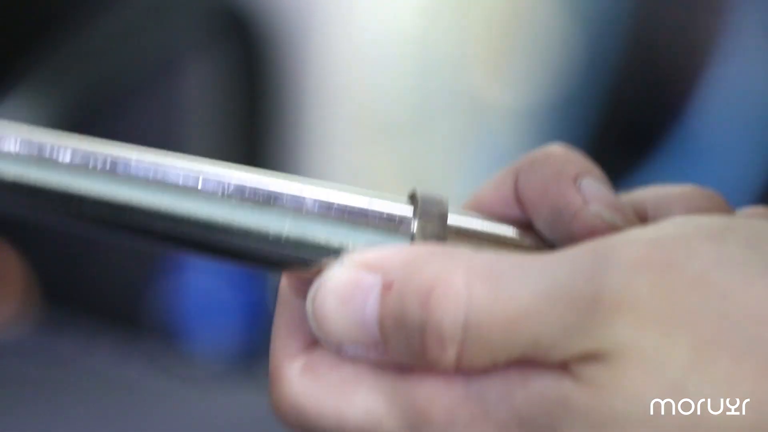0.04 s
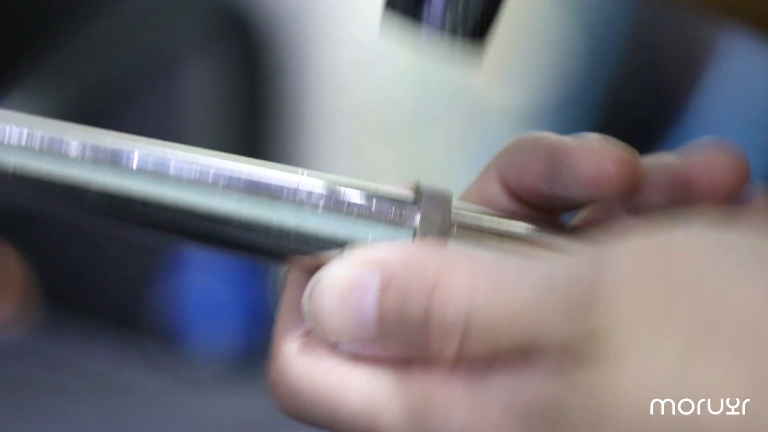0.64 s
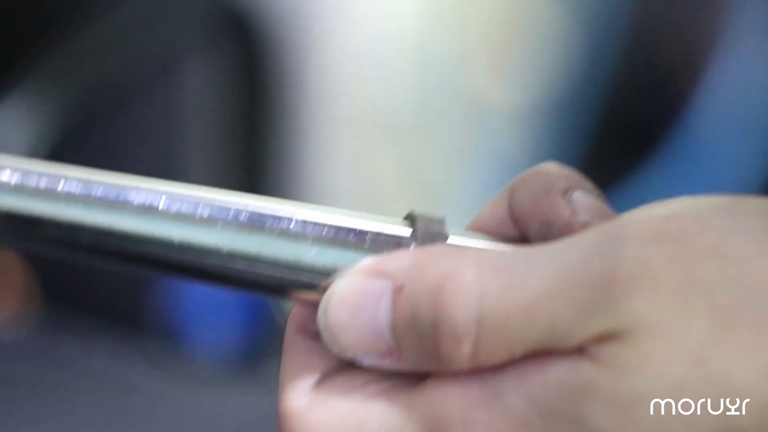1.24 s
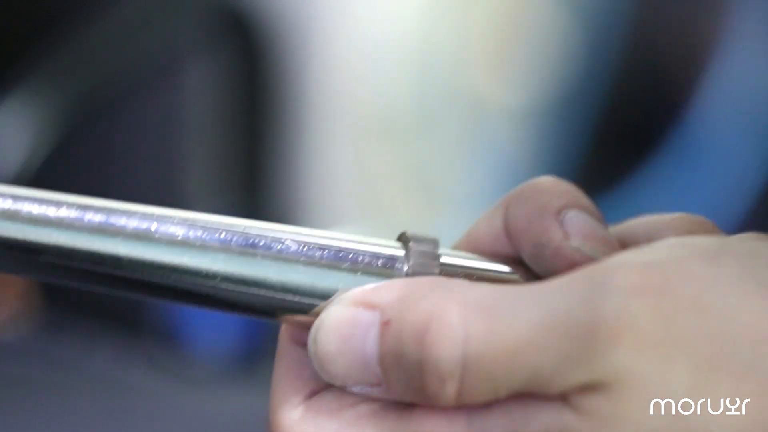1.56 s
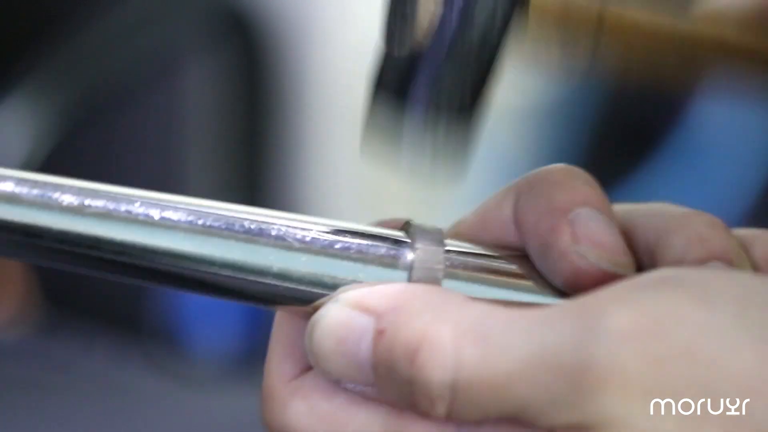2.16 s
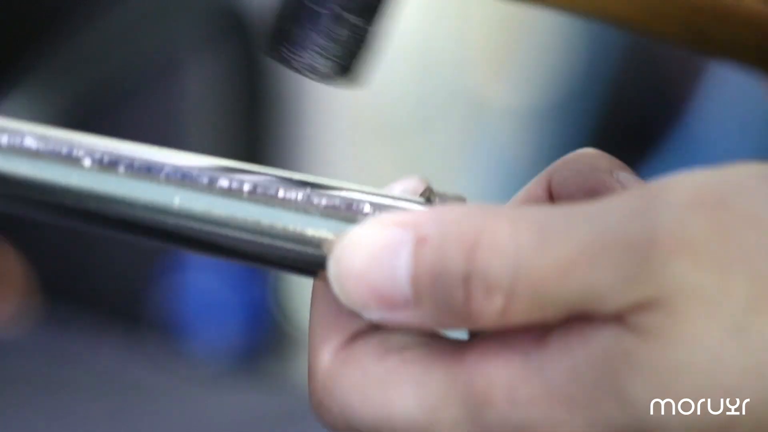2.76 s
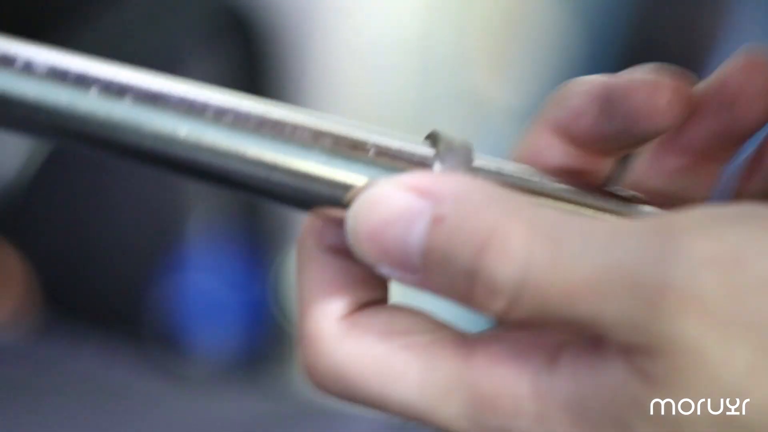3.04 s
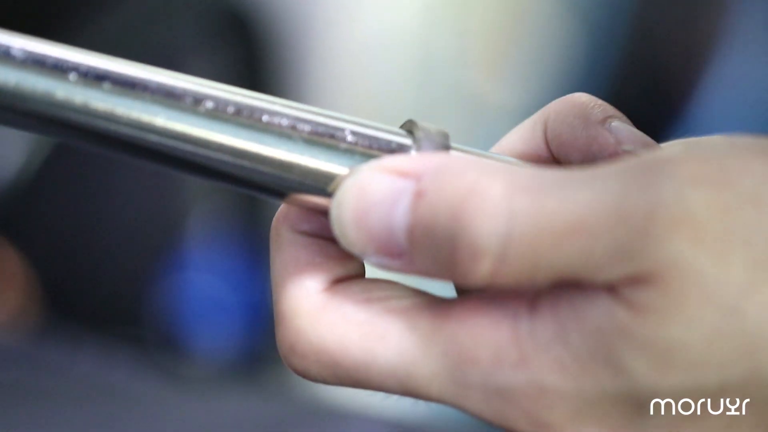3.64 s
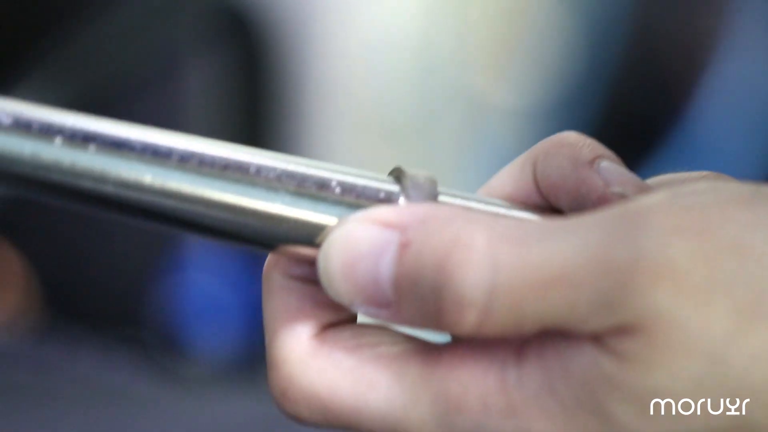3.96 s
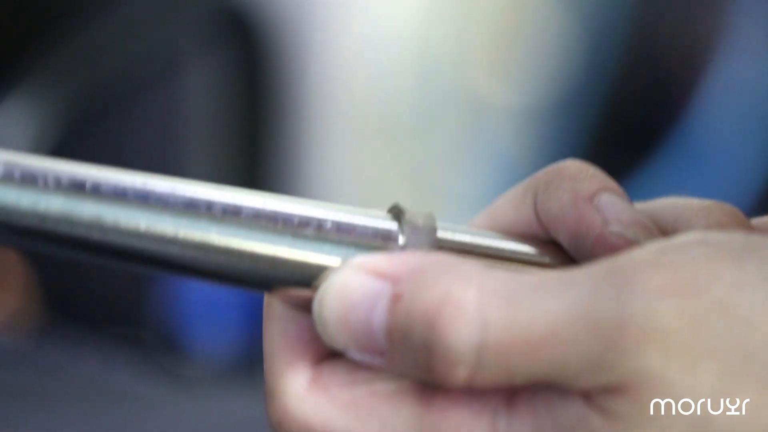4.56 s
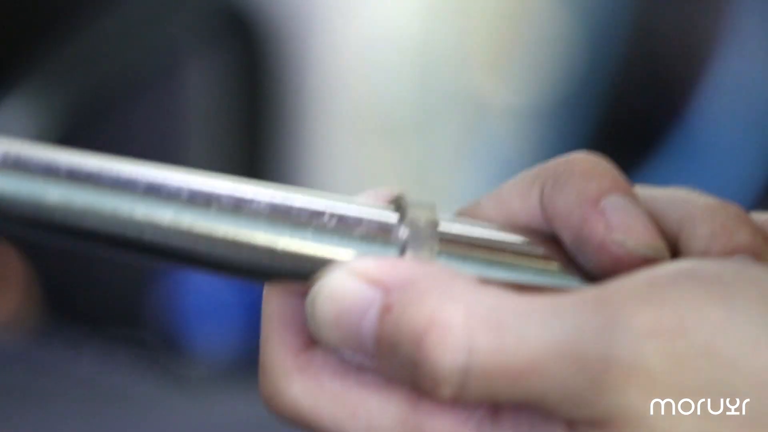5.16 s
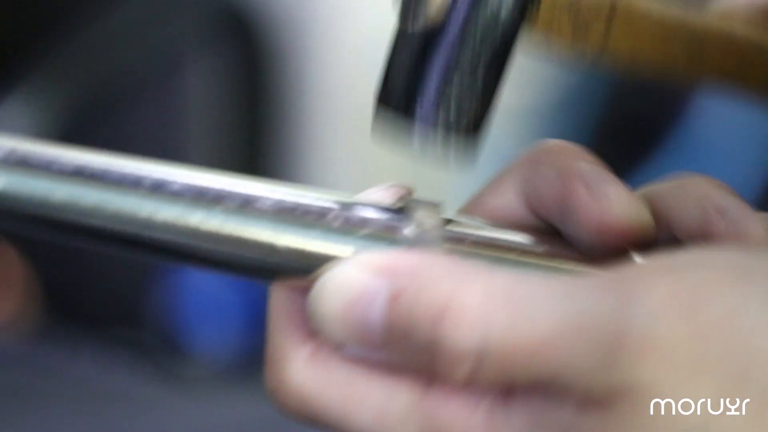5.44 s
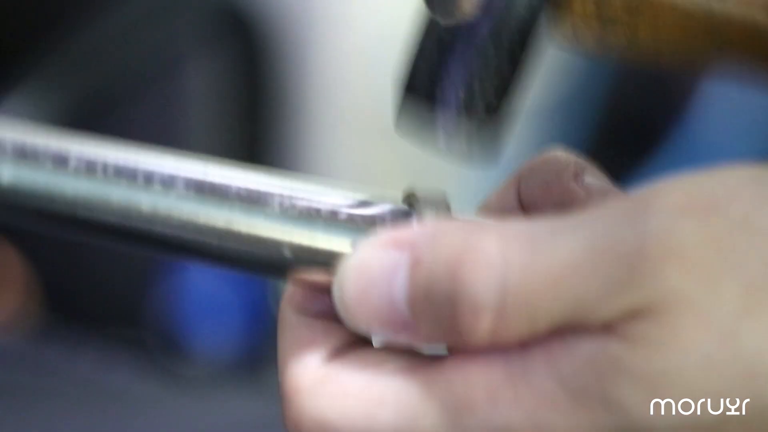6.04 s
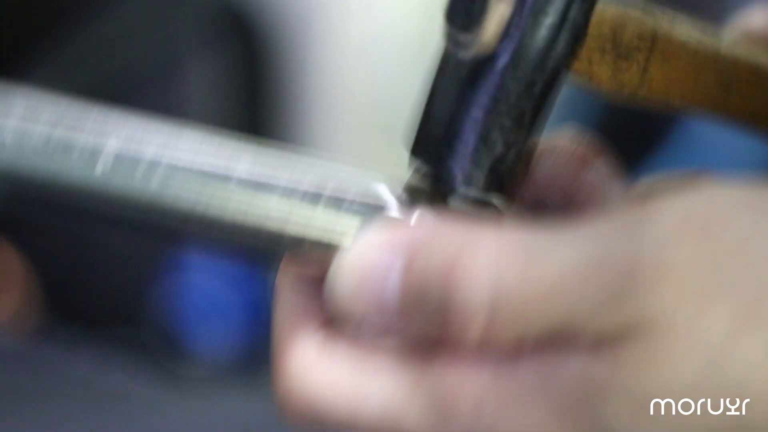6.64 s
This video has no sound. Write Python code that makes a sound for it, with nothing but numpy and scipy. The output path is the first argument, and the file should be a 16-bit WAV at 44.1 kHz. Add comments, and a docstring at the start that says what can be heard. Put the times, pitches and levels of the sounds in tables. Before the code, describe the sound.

In a small, quiet workshop, runs of crisp metallic clinks sound close to the microphone as a little hammer strikes a ring on a steel bar. The hand quickly damps each high ring, and the hits clip slightly. The even tapping skips a beat, carries on, then stops for about a second of soft scuffing and skin sliding on steel. It starts again and skips once more near the end, over faint air noise and hum.

```python
"""Tapping a ring on a mandrel

A small steel hammer taps a ring on a hand-held steel mandrel, about three blows a second, in a small
workshop. Each impact cracks and excites the bar's bending modes; the hand damps them and the room
carries them on. Soft scuffs fall between blows, and in the long pause the fingers slide along the bar
to turn the ring. The close microphone overloads, and its gain control ducks the noise after each blow."""
import sys
import numpy as np
from scipy import signal
from scipy.fft import rfft, irfft
from scipy.io import wavfile
from scipy.ndimage import minimum_filter1d

SR = 44100
rng = np.random.default_rng(int(sys.argv[2]) if len(sys.argv) > 2 else 0)


def wav_out(sig):
    """Save sig, one row per channel (or a flat mono array), as 16-bit PCM at SR to the path in sys.argv[1]."""
    wavfile.write(sys.argv[1], SR, np.round(np.clip(np.atleast_2d(sig).T, -1, 1) * 32767).astype(np.int16))


N = 304731
TIME = np.arange(N) / SR
LEAD = SR // 5  # samples before time zero: the hammering is already under way
SIDES = np.array([[.5], [-.5]])  # splits a left-minus-right difference over the two channels

# Hammer blows. Each row: start in seconds, relative force in dB, brightness in dB (hardness of contact).
BLOWS = [(-.11, 2, 2), (.2208, 0, 2.5), (0.5516, 0, 1.5), (1.1741, -0.99, 0), (1.5047, 0, 0.5),
         (1.83, 0, 3), (2.152, 0, 3), (2.4726, -1.8, -3), (3.768, -3, -4.5), (4.1119, 0, 4), (4.4377, 0, 6),
         (4.7665, -1, 4.5), (5.0861, -2, 4.5), (5.4171, -1, 3), (6.0507, 0, 2.5), (6.3786, .5, 3.5),
         (6.6959, 0, 3)]


def undb(db):
    """Convert decibels to an amplitude ratio."""
    return 10 ** (np.asarray(db) / 20)


def unit(x):
    """Normalise each channel to an rms of 1."""
    return x / np.sqrt(np.mean(x ** 2, axis=-1, keepdims=True))


def decay(t, t60):
    """Exponential damping: the level falls 60 dB in t60 seconds."""
    return np.exp(-np.log(1000) * t / t60)


def bump(centre_s, length_s):
    """A Gaussian envelope: a smooth rise and fall."""
    return np.exp(-(2 * (TIME - centre_s) / length_s) ** 2)


def along(hz, points):
    """Interpolate (Hz, value) points on a logarithmic frequency axis."""
    point_hz, values = np.transpose(points)
    return np.interp(np.log(np.maximum(hz, 1)), np.log(point_hz), values)


def highpass(x, hz, order):
    """A Butterworth filter: below the cutoff the level falls 6 dB per octave for each order."""
    return signal.sosfilt(signal.butter(order, hz, "highpass", fs=SR, output="sos"), x)


def colour(x, points, size=4096):
    """A minimum-phase filter with the given (Hz, dB) spectral shape and unit power gain."""
    cepstrum = irfft(along(np.fft.rfftfreq(size, 1 / SR), points) * np.log(10) / 20)
    cepstrum[1:size // 2] *= 2  # folding the cepstrum makes the response causal
    cepstrum[size // 2 + 1:] = 0
    response = irfft(np.exp(rfft(cepstrum)))
    return signal.oaconvolve(x, response[None] / np.linalg.norm(response), axes=-1)[:, :x.shape[-1]]


def stereo_noise(size, side):
    """White noise whose coherence between the ears falls from full at side = 0 to none at side = 1."""
    mid, apart = rng.standard_normal((2, size))
    return unit(np.array([mid + side * apart, mid - side * apart]))


def add(track, start_s, sound):
    """Superpose a sound on a track that begins LEAD samples before time zero."""
    start = LEAD + int(start_s * SR)
    track[:, start:start + sound.shape[-1]] += sound[:, :track.shape[-1] - start]


def cracks(room, blow_db=13.5, t60=0.021, room_db=-2.46, pan_db=-1.0):
    """Impact noise: hammer face, ring and bar clash briefly; parts this small radiate no bass."""
    # Spectrum of the crack. Each row: frequency in Hz, relative level in dB.
    spectrum = [(1000, -27.5), (1500, -13), (2300, -11.5), (2850, -6), (4000, -3), (5000, -7), (6100, -2),
                (7200, -2), (8700, -3), (9800, -6), (12000, -18.5), (14500, -27.5), (16000, -24)]
    # Light touches of the ring on the bar. Each row: start in seconds, relative level in dB.
    ticks = [(2.827, -46)]
    impacts = [(start, blow_db + force_db) for start, force_db, _ in BLOWS] + ticks
    t, track = TIME[:SR // 10], np.zeros((2, LEAD + N))
    for start, db in impacts:
        add(track, start, undb(db) * stereo_noise(len(t), side=0.98) * decay(t, t60))
    radiated = highpass(colour(track, spectrum), hz=900, order=3)
    return in_room(radiated, room, room_db) * undb(pan_db * SIDES)


def hammer(left_lead_rad=-1.11, pan_db=-3, pitch_scatter=0.019):
    """Free vibration: the head's heavily damped modes ring at slightly different pitches on each blow."""
    # Modes of the hammer head. Each row: frequency in Hz, relative level in dB, T60 in seconds.
    modes = [(2940, 6.5, 0.02), (5925, 18, 0.0086), (8289, 21.5, 0.0058)]
    t, track = TIME[:SR // 20], np.zeros((2, LEAD + N))
    detunings = 1 + pitch_scatter * rng.standard_normal((len(BLOWS), len(modes)))
    for (start, _, _), blow_detunings in zip(BLOWS, detunings):
        for (hz, db, t60), detune in zip(modes, blow_detunings):
            envelope = undb(db + pan_db * SIDES) * decay(t, t60)
            add(track, start, envelope * np.sin(2 * np.pi * hz * detune * t + left_lead_rad * SIDES))
    return track[:, LEAD:]


def mandrel(room, twin_db=-1.5, split_scatter=0.23, low_hz=3500, high_hz=8000):
    """Beating modes: the bar bends in two planes at slightly different pitches, split by the grip."""
    # Pairs of bending modes. Each row: frequency in Hz, relative level in dB, T60 in seconds,
    # reverberant-to-direct ratio in dB, left minus right in dB, phase lead of the left in radians,
    # rise of pitch in Hz per second, typical split of the pair in Hz.
    modes = [(699.2, -29, 0.19, 12.5, -5, 2.87, 0, 2.5), (1835.7, -0.5, 0.28, -8.5, -0.5, 0.29, 0, 5.22),
             (3452, 9.5, 0.14, -7, 3, -1.94, 0.5, 6.1), (5511, 7.5, 0.11, -4, -2.5, -1.51, 9, 30),
             (8019, 6, 0.11, -2, -4.5, -1.27, 3.5, 23), (10880, 7, 0.017, -6, -6, 1.13, 16, 98),
             (14050, -13.5, 0.035, -4, -5, -2.5, 15, 50)]
    t, ringing = TIME[:SR // 2], 0
    grips = np.exp(split_scatter * rng.standard_normal((len(BLOWS), len(modes))))
    for (hz, db, t60, room_db, pan_db, left_lead, rise, split_hz), mode_grips in zip(modes, grips.T):
        track = np.zeros((2, LEAD + N))
        envelope = undb(db + pan_db * SIDES) * decay(t, t60) * np.exp(1j * left_lead * SIDES)
        tilt = np.interp(hz, [low_hz, high_hz], [-1, 1])  # hard contact favours high modes, soft low
        for (start, force_db, bright_db), grip in zip(BLOWS, mode_grips):
            pitch_hz = hz + rise * start  # upper modes sharpen as the ring creeps along the taper
            beating = 1 + undb(twin_db) * np.exp(2j * np.pi * split_hz * grip * t)
            pair = np.exp(2j * np.pi * pitch_hz * t) * beating
            add(track, start, undb(force_db + tilt * bright_db) * np.imag(envelope * pair))
        radiated = highpass(track, hz / 2, order=2)  # a thin bar radiates little below each mode
        ringing = ringing + in_room(radiated, room, room_db)
    return ringing


def room_response(gap_s=0.0033, wall_s=0.011, spread_s=0.001, wall_db=4):
    """Reverberation: early reflections from bench and walls, and a tail whose top treble dies first."""
    # Reverberation time of the workshop. Each row: frequency in Hz, T60 in seconds.
    reverberation_times = [(200, 0.25), (2000, 0.26), (5000, 0.27), (9000, 0.24), (11000, 0.23),
                           (15000, 0.18)]
    t = TIME[:SR * 2 // 3]
    spectrum = rfft(rng.standard_normal((2, len(t))))
    hz = np.fft.rfftfreq(len(t), 1 / SR)
    edges_hz = np.linspace(0, SR / 2, 13)
    tail = 0
    for low, high in zip(edges_hz, edges_hz[1:]):
        band = irfft(spectrum * ((hz >= low) & (hz < high)), len(t))
        tail = tail + band * decay(t, along((low + high) / 2, reverberation_times))
    onset = np.clip(t / gap_s - 1, 0, 1)
    early_cluster = undb(wall_db) * np.exp(-((t - wall_s) / spread_s) ** 2)
    return tail * onset * (1 + early_cluster)


def in_room(direct, room, room_db):
    """Convolution adds the reverberant field, room_db relative to the direct sound; the lead is cut."""
    wet = signal.fftconvolve(direct, room, axes=-1)[:, :LEAD + N]
    reverberant = undb(room_db) * unit(wet) * np.std(direct, axis=-1, keepdims=True)
    return (direct + reverberant)[:, LEAD:]


def workshop(air_db=-47.5, swell_db=5.5, side=0.5, coherent_below_hz=110):
    """Ambient noise: a rush of air, coherent in the bass, and a motor's hum; both swell slowly once."""
    # Spectrum of the air noise. Each row: frequency in Hz, relative spectral density in dB.
    air_spectrum = [(20, -10), (40, -7), (56, 3), (75, -1), (140, -3), (280, -4), (420, -1), (750, -6),
                    (1200, -9), (1600, -18), (3000, -25), (5000, -31), (9000, -31), (16000, -41)]
    # Harmonics of the motor. Each row: frequency in Hz, rms level outside the swell in dB.
    harmonics = [(57.5, -54.5), (115, -68)]
    mid, apart = rng.standard_normal((2, N))
    apart = side * highpass(apart, coherent_below_hz, order=1)
    air = unit(colour(np.array([mid + apart, mid - apart]), air_spectrum)) * undb(air_db)
    hum = sum(undb(db) * np.sqrt(2) * np.sin(2 * np.pi * (hz * TIME + rng.random()))
              for hz, db in harmonics)
    return (air + hum) * undb(swell_db * bump(centre_s=3.6, length_s=1.41))


def friction(strokes, spectrum, side):
    """Friction noise: a fixed spectrum whose amplitude swells and fades with each stroke."""
    envelope = sum(undb(db) * bump(centre_s, length_s) for centre_s, length_s, db in strokes)
    return unit(colour(stereo_noise(N, side), spectrum)) * envelope


def scuffs():
    """Brief friction in handling makes soft, dull scuffs between the blows."""
    # Scuffs. Each row: centre in seconds, length in seconds, rms level at the centre in dB.
    strokes = [(.857, 0.065, -45.5), (.973, 0.068, -46), (1.697, 0.051, -43.5), (3.042, 0.14, -43),
               (3.525, 0.062, -40), (4.073, .046, -43), (4.405, 0.05, -38), (5.346, 0.15, -44.5)]
    # Spectrum of a scuff. Each row: frequency in Hz, relative level in dB.
    spectrum = [(450, -28), (900, -3), (1170, -2), (1900, -29), (4000, -42)]
    return friction(strokes, spectrum, side=0.99)


def finger_slides():
    """Sliding friction of skin on steel makes a faint hiss as the fingers turn the ring."""
    # Slides. Each row: centre in seconds, length in seconds, rms level at the centre in dB.
    strokes = [(3.18, 0.28, -51.5), (3.39, 0.19, -57)]
    # Spectrum of skin on steel. Each row: frequency in Hz, relative level in dB.
    spectrum = [(1500, 0), (2900, 4.5), (4800, -4.5), (8500, 1), (15000, -12)]
    return friction(strokes, spectrum, side=1.0)


def scene():
    """Superposition: blows, handling and workshop noise add at the microphone."""
    room = room_response()
    handling = scuffs() + finger_slides()
    return mandrel(room) + hammer() + cracks(room) + handling + workshop()


def gain_control(x, threshold_db=6.5, attack_s=0.001, hold_s=0.053, release_db_per_s=150,
                 start_cut_db=22):
    """Limiting: peaks pull the gain down fast; it holds a moment, then climbs back. It starts low."""
    peak_db = 20 * np.log10(np.abs(x).max(axis=0) + 1e-9)
    excess_db = np.maximum(peak_db - threshold_db, 0)
    half_hold = int(hold_s * SR / 2)
    # the greatest excess within the past hold time
    held_db = -minimum_filter1d(-excess_db, 2 * half_hold + 1, origin=half_hold, mode="constant")
    climb_db = release_db_per_s * TIME
    cut_db = np.maximum.accumulate(np.maximum(held_db + climb_db, start_cut_db)) - climb_db
    pole = np.exp(-1 / (attack_s * SR))
    smooth_cut_db, _ = signal.lfilter([1 - pole], [1, -pole], cut_db, zi=[pole * start_cut_db])
    return x * undb(-smooth_cut_db)


def record(dry, top_hz=15700):
    """Overload: the onset of a blow outruns the gain control and clips; a steep low-pass follows."""
    clipped = np.clip(gain_control(dry), -1, 1)
    return signal.sosfilt(signal.ellip(8, .2, 70, top_hz, fs=SR, output="sos"), clipped)


dry = scene()
out = record(dry)
wav_out(out)
```